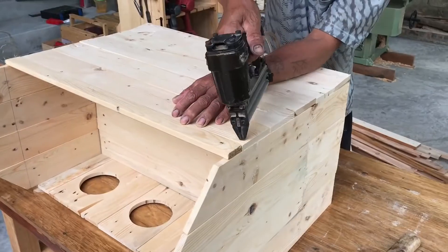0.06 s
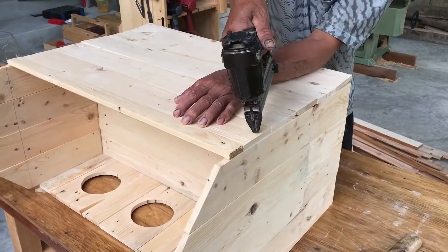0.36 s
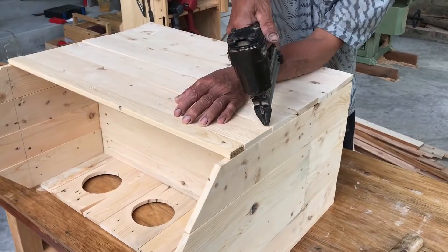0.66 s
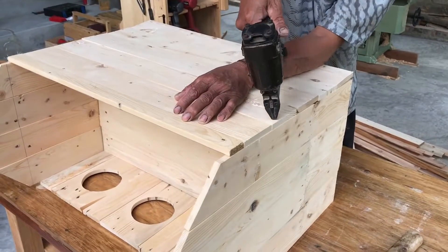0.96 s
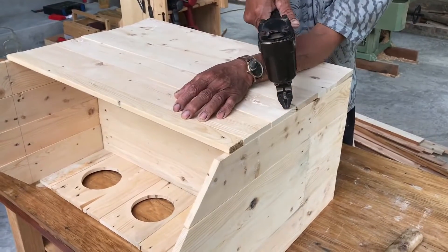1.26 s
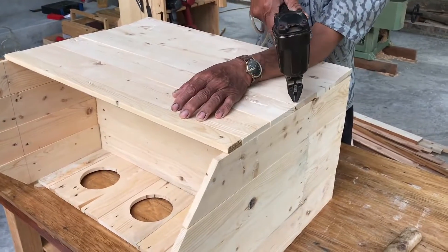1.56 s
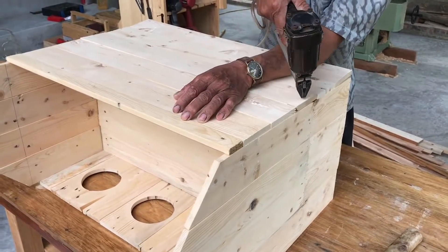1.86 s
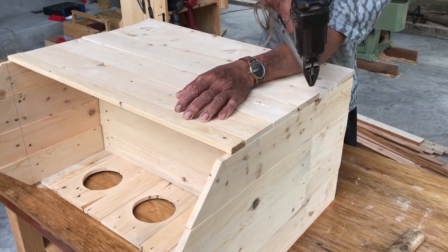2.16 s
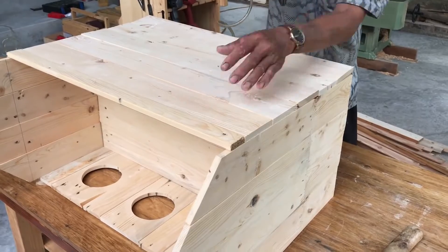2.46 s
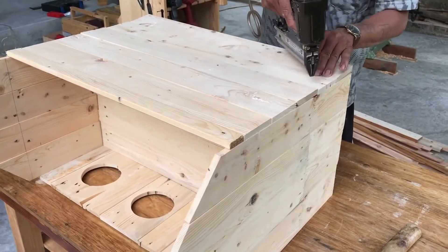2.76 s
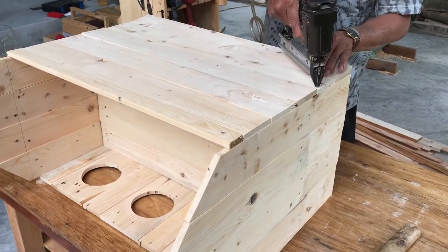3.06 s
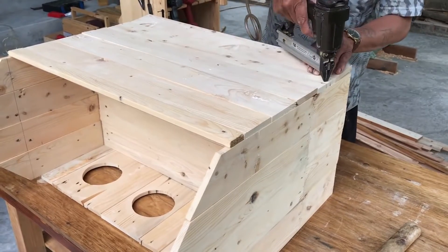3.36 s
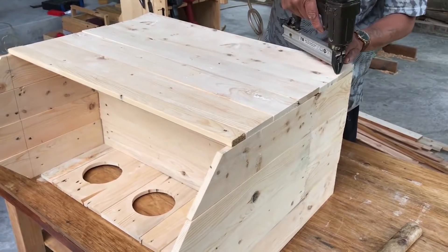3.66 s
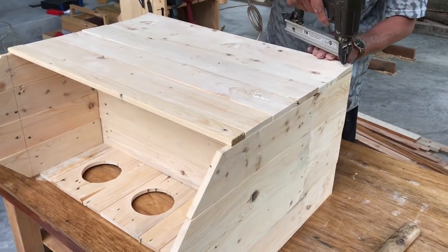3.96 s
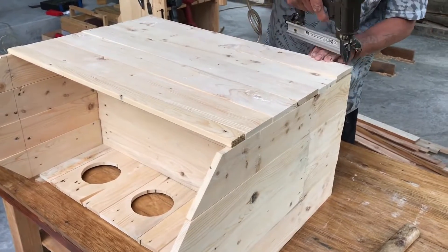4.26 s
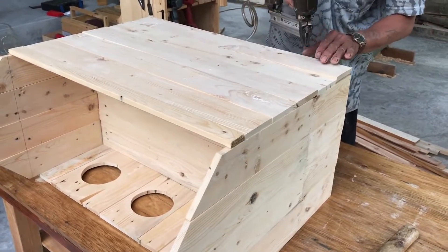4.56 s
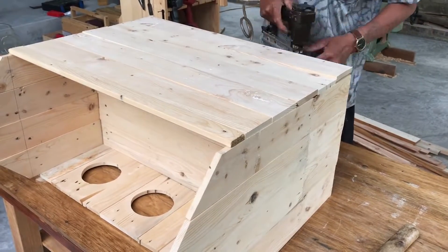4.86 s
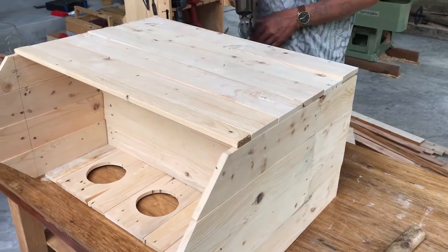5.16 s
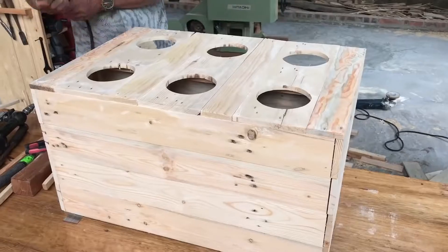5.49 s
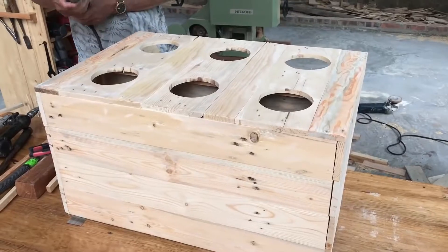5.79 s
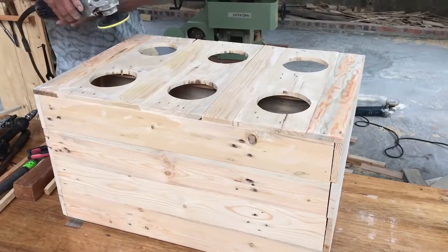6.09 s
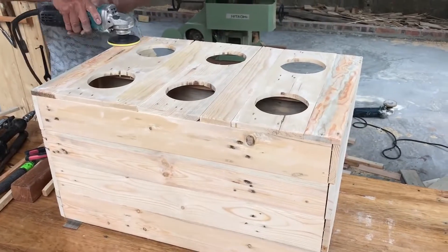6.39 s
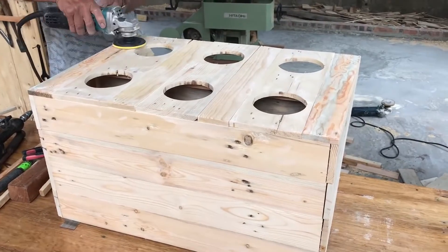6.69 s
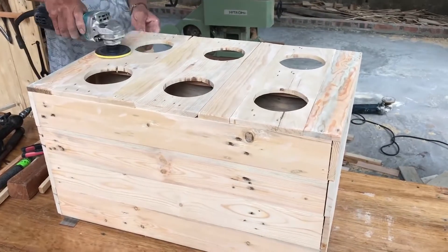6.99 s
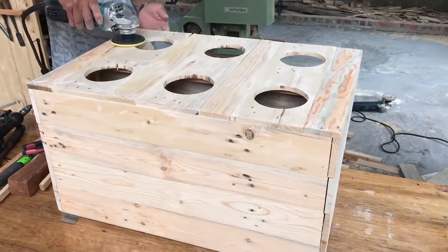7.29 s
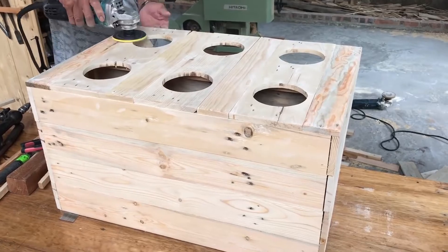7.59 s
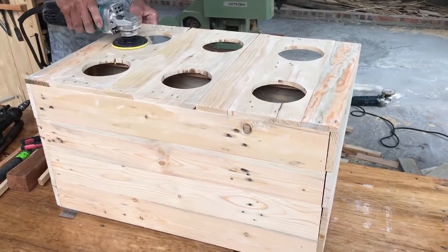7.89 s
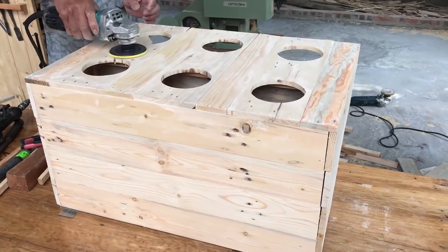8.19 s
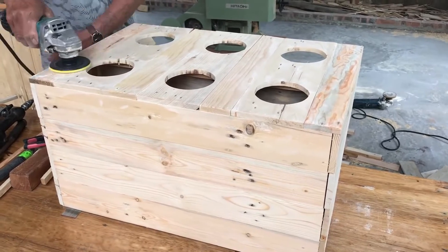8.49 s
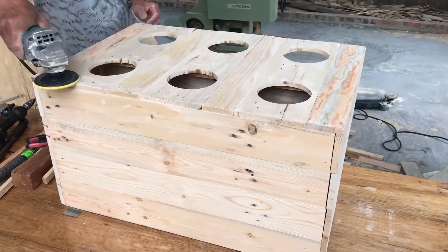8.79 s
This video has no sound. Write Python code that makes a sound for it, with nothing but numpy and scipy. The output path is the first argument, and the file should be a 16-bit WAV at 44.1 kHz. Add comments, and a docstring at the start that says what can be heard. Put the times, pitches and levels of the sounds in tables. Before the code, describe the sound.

An air nailer drives eleven nails into a wooden box, a run of seven, a short pause, then four more. Each shot is a hissing crack with a woody thump and a bright exhaust clack right behind it. After a lull, an angle grinder switches on with a rushing whine and its sanding disc rasps over the boards in short touches. Heard close, in stereo, over faint workshop noise.

```python
"""Air nailer and angle grinder

A workshop, a stereo pair close to the bench. An air nailer drives eleven nails into a pine box: each
shot is a valve hiss, the driver's crack with a thump of the boards, and a bright exhaust clack as the
piston returns. Then an angle grinder spins up and sands the box: its fan rushes, its gears whine, and
the disc rasps and makes the boards drone. The recorder's gain control ducks the room noise."""
import sys
import numpy as np
from scipy import signal
from scipy.fft import rfft, irfft, next_fast_len
from scipy.io import wavfile
from scipy.ndimage import uniform_filter1d

SR = 44100
rng = np.random.default_rng(int(sys.argv[2]) if len(sys.argv) > 2 else 0)


def store_pcm(level_fs):
    """Save levels as 16-bit WAV."""
    pcm = np.round(np.clip(level_fs, -1, 1) * 32767).astype(np.int16)
    wavfile.write(sys.argv[1], SR, np.atleast_2d(pcm).T)


N = 394254
TIME = np.arange(N) / SR

# spectra of the nailer's hiss, and of the box's woody knock and low thud: frequency_hz, level_db
HISS_SPECTRUM = [(200, -9), (600, -10.5), (1500, -5), (3000, -4), (6000, -4.5), (8000, -5.5), (15000, -4.5)]
KNOCK_SPECTRUM = [(60, -7), (150, 3), (300, -0.5), (500, -8.5), (680, -6), (1100, -10), (2500, -48)]
THUD_SPECTRUM = [(25, -5.5), (90, -4.5), (160, -7), (300, -19.5), (700, -33.5), (2000, -56)]

FIRM_THUMP_DB = -16  # the boards under a firm blow
SWITCH_ON_S = 5.946
MESH_START_HZ, MESH_TOP_HZ = 2794, 6874  # the rate at which the grinder's gear teeth meet


def gain_of(db):
    """Decibels to gain."""
    return 10 ** (np.asarray(db) / 20)


def unit_rms(x):
    """Scales to rms 1."""
    return x / np.sqrt(np.mean(x ** 2) + 1e-20)


def value_at(points, hz):
    """Reads a table on a log-frequency axis."""
    table_hz, value = np.transpose(points)
    return np.interp(np.log(hz + 1), np.log(table_hz + 1), value)


def add(mix, start_s, sound):
    """Mixes a sound in at a time."""
    start = round(start_s * SR)
    sound = sound[..., max(-start, 0):]
    part = mix[:, max(start, 0):][:, :sound.shape[-1]]
    part += sound[..., :part.shape[1]]


def colour(x, spectrum):
    """Gives two unrelated channels a spectrum and the likeness of the microphone pair."""
    # likeness of left and right: frequency_hz, correlation
    pair_likeness = [(50, 0.96), (300, 0.41), (700, 0.18), (1400, 0.64), (3000, 0.25), (15000, 0.2)]
    hz = np.fft.rfftfreq(x.shape[1], 1 / SR)
    likeness = value_at(pair_likeness, hz)
    a, b = rfft(x)
    mid, side = a * np.sqrt(1 + likeness), b * np.sqrt(1 - likeness)
    shaped = np.array([mid + side, mid - side]) * gain_of(value_at(spectrum, hz))
    return unit_rms(irfft(shaped, x.shape[1]))


def noise(spectrum, size=N):
    """Steady stereo noise from points of frequency_hz, level_db."""
    return colour(rng.standard_normal((2, next_fast_len(size))), spectrum)[:, :size]


def burst(spectrum, rise_s, t60, snap_s=None, size=8192):
    """A puff of noise that swells and dies away, with an optional snap at its front."""
    t = np.arange(size) / SR
    shape = (1 - np.exp(-t / rise_s)) ** 2 * gain_of(-60 * t / t60)
    if snap_s:
        shape *= 1 + np.exp(-t / snap_s)
    return shape * noise(spectrum, size)


def held(start_s, length_s, attack_s, release_s):
    """An envelope that rises, holds and dies away."""
    t = TIME - start_s
    return np.clip(t / attack_s, 0, 1) * np.exp(-np.clip((t - length_s) / release_s, 0, 20))


def wander(hz):
    """Random drift of rms 1, up to a rate."""
    return unit_rms(signal.sosfilt(signal.butter(2, hz, fs=SR, output="sos"), rng.standard_normal(N)))


def brighten(x, db, corner_hz=6500):
    """Lifts or lowers the treble."""
    size = x.shape[1]
    hz = np.fft.rfftfreq(2 * size, 1 / SR)
    shelf = gain_of(db / (1 + (corner_hz / (hz + 1)) ** 6))
    return irfft(rfft(x, 2 * size) * shelf)[:, :size]


def room_tone(dropout_s=5.584):
    """Steady shop noise, with a brief dropout at a cut between the two jobs."""
    # background noise: frequency_hz, level_db
    shop_spectrum = [(24, -37), (40, -6.5), (101, 1.5), (126, -2.5), (522, -11.5), (686, -8.5), (949, -12),
                     (1130, -10), (3300, -19.5), (15500, -42.5)]
    dropout_db = -25 * np.exp(-((TIME - dropout_s) / .011) ** 2)
    return gain_of(-68 + dropout_db) * noise(shop_spectrum)


def swelling_hiss(swell_s, t60, size=4096):
    """A soft hiss swells into the hit and dies away; gives (start_s from the peak, hiss)."""
    t = np.arange(-size, size) / SR
    shape = np.exp(np.minimum(t, 0) / swell_s) * gain_of(-60 * np.maximum(t, 0) / t60)
    return -size / SR, shape * noise(HISS_SPECTRUM, 2 * size)


def early_reflections(x, strength=.33, count=4):
    """Nearby boards throw the sound back and comb each blow a little differently."""
    out = x.copy()
    for delay_s, sign in zip(rng.uniform(.0006, .005, count), rng.choice([-1, 1], count)):
        add(out, delay_s, strength * sign * x)
    return out / np.sqrt(1 + count * strength ** 2)


def board_thump(hz, swell_s, sway=.55, sway_hz=118):
    """Pushed boards swing back for a cycle or two; the box's side walls sway against each other."""
    t = np.arange(6000) / SR
    walls = sway * np.array([[1], [-1]]) * np.sin(2 * np.pi * (sway_hz * t + rng.random()))
    return (walls - np.sin(2 * np.pi * hz * t)) * (t / swell_s) * np.exp(1 - t / swell_s)


def driver_blows(valve_lead_s=.011):
    """The valve puffs, the driver cracks down, the nail rings and the box knocks and thumps."""
    # one row a nail: start_s, crack_db, treble_db, thump_db, ring_hz, ring_db
    blows = [(-0.01,-26,-9.5,-34,3000,-34), (0.377,-24,-2,-15,3140,-25), (0.718,-20,-6,-44.5,1670,-24),
             (1.124,-19.5,-0.5,-15.5,1800,-26.5), (1.51,-19.5,-1,-15,2900,-32.5),
             (1.901,-20,-3.5,-23,1630,-23.5), (2.282,-23.5,-5,-17,2810,-40),
             (3.204,-20,-4.5,-35.5,3650,-18), (3.529,-20.5,-7.5,-40,2990,-35),
             (3.979,-19.5,-1,-25,2380,-34), (4.382,-19,-4.5,-21,1724,-19)]
    out = np.zeros((2, N))
    for start_s, crack_db, treble_db, thump_db, ring_hz, ring_db in blows:
        valve_s = start_s - valve_lead_s
        offset_s, hiss = swelling_hiss(swell_s=.0042, t60=.12)
        add(out, valve_s + offset_s, gain_of(-29) * hiss)
        add(out, valve_s, gain_of(-25.5) * burst(HISS_SPECTRUM, rise_s=.0006, t60=.036))
        add(out, start_s, gain_of(crack_db) * driver_crack(treble_db))
        ring = [(ring_hz / 2, -45), (ring_hz / 1.15, -18), (ring_hz, 0),
                (ring_hz * 1.15, -18), (ring_hz * 2, -45)]
        add(out, start_s, gain_of(ring_db) * burst(ring, rise_s=.0008, t60=.085))
        knock_db = -21 + .42 * (thump_db - FIRM_THUMP_DB)
        add(out, start_s, gain_of(knock_db) * burst(KNOCK_SPECTRUM, rise_s=.0011, t60=.068))
        add(out, start_s, -gain_of(thump_db) * board_thump(hz=82, swell_s=.0043))
        add(out, start_s, gain_of(thump_db - 8) * burst(THUD_SPECTRUM, rise_s=.0014, t60=.07))
    return out


def driver_crack(treble_db):
    """The driver lands with a sharp snap that glances off the boards."""
    # the impact: frequency_hz, level_db
    crack_spectrum = [(290, -33), (500, -11.5), (863, -7.5), (1510, -2.5), (1650, -6), (1900, -5.5),
                      (2930, -3.5), (3790, -4.5), (4840, -7), (5510, -5.5), (10200, -21), (14200, -20.5),
                      (15500, -27.5)]
    crack = burst(crack_spectrum, rise_s=.00041, t60=.12, snap_s=.0045)
    return brighten(early_reflections(crack), treble_db)


def piston_returns():
    """The piston clacks home and jolts the box as the exhaust opens and sighs out."""
    # one return after each nail: start_s, clack_db, thump_db
    returns = [(0.089,-17,-30.5), (0.45,-19,-26), (0.797,-18.5,-30.5), (1.2,-18.5,-19), (1.602,-16.5,-17.5),
               (1.996,-16,-20), (2.372,-19,-22), (3.278,-16.5,-31.5), (3.625,-18,-23), (4.059,-18.5,-16),
               (4.457,-20.5,-13.5)]
    # the exhaust clack: frequency_hz, level_db
    clack_spectrum = [(290, -31.5), (500, -9.5), (851, -15.5), (1170, -2.5), (2160, -9), (2610, -5),
                      (3480, -9.5), (4700, -8), (5130, -10), (5750, -5.5), (7340, -10), (13000, -6.5),
                      (15500, -12)]
    out = np.zeros((2, N))
    for start_s, clack_db, thump_db in returns:
        offset_s, hiss = swelling_hiss(swell_s=.009, t60=.041)
        add(out, start_s + offset_s, gain_of(-32) * hiss)
        clack = early_reflections(burst(clack_spectrum, rise_s=.0006, t60=.084, snap_s=.0026))
        add(out, start_s - .0005, gain_of(clack_db) * brighten(clack, db=-2.9))
        add(out, start_s, gain_of(-48.5) * burst(HISS_SPECTRUM, rise_s=.004, t60=.35, size=16384))
        add(out, start_s, gain_of(-13.5) * burst(KNOCK_SPECTRUM, rise_s=.00081, t60=.03))
        # a lighter return moves less of the box, which swings faster
        thump_hz = 94 * 2 ** ((FIRM_THUMP_DB - thump_db) / 19.5)
        add(out, start_s + .0008, gain_of(thump_db) * board_thump(thump_hz, swell_s=.0044))
        add(out, start_s, gain_of(thump_db - 5) * burst(THUD_SPECTRUM, rise_s=.0012, t60=.065))
    return out


def workshop_reverb(x):
    """Sparse reflections of random sign, each band dying at its own speed."""
    # decay of the room: frequency_hz, t60_s
    room_decay = [(80, 0.39), (400, 0.12), (2000, 0.29), (6000, 0.44), (15000, 0.17)]
    taps = np.zeros((2, SR))
    arrivals = np.arange(300, SR - 20, 20) + rng.integers(0, 20, (2, (SR - 301) // 20))
    np.put_along_axis(taps, arrivals, rng.choice([-1., 1.], arrivals.shape), 1)
    hz, t, bands = signal.stft(taps, SR, nperseg=256)
    decay = gain_of(-60 * t / value_at(room_decay, hz)[:, None])
    tail = signal.istft(bands * decay, SR, nperseg=256)[1]
    return signal.fftconvolve(x, tail / np.linalg.norm(tail[0]), axes=1)[:, :N]


def moving_reverb(x, turn_s=1.1):
    """The nailer moves along the box, so each shot meets another mix of the room's reflections."""
    return sum(workshop_reverb(x * np.cos(np.pi * (TIME / turn_s + shift))) for shift in (0, .5))


def thuds_and_slides():
    """Short thuds and ticks, and the rumble of hands sliding over the box."""
    # hands on the wood: start_s, length_s, level_db
    slides = [(2.794, .22, -63), (5.61, 0.49, -57.5)]
    # thuds and ticks (the one at 5.6 s is a click after the dropout): start_s, thud_db, tick_db
    thuds = [(0.172,-31.5,-55), (0.244,-45,-52), (0.564,-45.5,-65), (1.297,-50,-61), (2.105,-46,-56.5),
             (3.879,-50,-75), (4.198,-39.5,-57), (4.56,-45,-63), (5.599,-55,-53.5), (5.803,-64,-59),
             (6.158,-38,-22.5)]
    rumble_spectrum = [(25, -6.5), (90, 4.5), (160, -7), (300, -22.5), (900, -48)]
    tick_spectrum = [(400, -7), (1300, -3.5), (4000, -4), (15000, -28.5)]
    sliding = sum(gain_of(db) * held(start_s, length_s, attack_s=.028, release_s=.08)
                  for start_s, length_s, db in slides)
    out = noise(rumble_spectrum) * sliding
    for start_s, thud_db, tick_db in thuds:
        add(out, start_s, gain_of(thud_db - 2.5) * burst(THUD_SPECTRUM, rise_s=.00089, t60=.13))
        add(out, start_s, gain_of(tick_db - 8.5) * burst(tick_spectrum, rise_s=.00025, t60=.21))
    return out


def motor(mesh_hz):
    """The grinder's switch snaps, and its fan and gears come up to speed together."""
    since_s = np.maximum(TIME - SWITCH_ON_S, 0)
    speed = mesh_hz / MESH_TOP_HZ
    out = np.minimum(since_s / .04, 1) * (fan(speed) + gears(mesh_hz, speed, since_s))
    switch_spectrum = [(300, -27), (900, 4), (2300, 0), (4500, -2), (15000, -26)]
    add(out, SWITCH_ON_S, gain_of(-31.5) * burst(switch_spectrum, rise_s=.0033, t60=.3, size=16384))
    return shifting_reflections(out)


def whistle(hz, width_hz, step=12):
    """Noise in a narrow resonance: a tone whose strength and phase drift at random."""
    slow_time = TIME[::step]
    smooth = signal.butter(2, width_hz / 2, fs=SR / step, output="sos")
    real, imag = signal.sosfilt(smooth, rng.standard_normal((2, 2, len(slow_time))))
    drift = np.array([np.interp(TIME, slow_time, channel) for channel in real + 1j * imag])
    phase = 2 * np.pi * np.cumsum(hz * np.ones(N)) / SR
    return unit_rms((drift * np.exp(1j * phase)).real)


def flutter(x, depth_db):
    """Patches of the spectrum, some 300 Hz wide and 30 ms long, swell and fade."""
    bands = signal.stft(x, nperseg=1024)[2]
    patches = uniform_filter1d(rng.standard_normal(bands.shape[1:]), size=7, axis=0)
    patches = unit_rms(uniform_filter1d(patches, size=3, axis=1))
    return unit_rms(signal.istft(bands * gain_of(depth_db * patches), nperseg=1024)[1][:, :N])


def fan(speed, fizz_hz=5960, db_per_octave=10):
    """The fan blows through resonant vents, louder and brighter with speed."""
    # rush of the air: frequency_hz, level_db
    rush_spectrum = [(100, -24.5), (450, -14), (750, -5.5), (1000, -6), (1350, 2), (1900, -9), (3000, -1),
                     (4000, 0.5), (4900, -3.5), (6800, -3), (7700, -8), (12500, -8.5), (15500, -11.5)]
    # air resonances of the vents: pitch_hz, width_hz, level_db
    vent_modes = [(1410, 300, -3), (2285, 350, -6.5), (2974, 200, -5.5), (4060, 230, -13),
                  (5520, 500, -6.5)]
    vents = unit_rms(sum(gain_of(db) * whistle(hz, width_hz) for hz, width_hz, db in vent_modes))
    air = gain_of(4) * noise(rush_spectrum) + gain_of(-1) * flutter(vents, depth_db=3.5)
    air *= gain_of(1.33 * wander(120) + .61 * wander(7.3))
    dull = signal.sosfiltfilt(signal.butter(2, fizz_hz, fs=SR, output="sos"), air)
    fizz = speed ** .76 * (air - dull)
    return (dull + fizz) * gain_of(-31.5 + db_per_octave * np.log2(speed))


def gears(mesh_hz, speed, since_s, strain_s=.24):
    """Gears and armature whine through the housing, harder under the pull of the start."""
    # the two whines: mesh_multiple, free_running_db, extra_strain_db
    whines = [(1, -44.5, 2.5), (.63, -52.5, 24)]
    # response of the housing: frequency_hz, gain_db
    housing = [(1000, -18), (2500, -18), (4000, 14.5), (5500, 1), (6900, 3), (8500, -3), (14000, 6)]
    smear = .55 - .25 * speed  # the tone spreads wider while the pitch sweeps, most at low speed
    out = 0
    for multiple, free_db, strain_db in whines:
        hz = multiple * mesh_hz
        tone = np.sqrt(1 - smear) * whistle(hz, width_hz=204) + np.sqrt(smear) * whistle(hz, width_hz=830)
        out += gain_of(free_db + strain_db * np.exp(-since_s / strain_s) + value_at(housing, hz)) * tone
    return out * approach(db_per_s=7)  # the gear head turns to the microphone


def shifting_reflections(x, strength=.22, count=4):
    """Reflections off the box shift as the tool moves, so the colour of the rush keeps changing."""
    out, samples = x.copy(), np.arange(N)
    for delay_s, rate_hz, phase in rng.uniform([.0008, .4, 0], [.006, 1.5, 1], (count, 3)):
        delayed = samples - SR * (delay_s + .0002 * np.sin(2 * np.pi * (rate_hz * TIME + phase)))
        out += strength * np.array([np.interp(delayed, samples, channel) for channel in x])
    return out / np.sqrt(1 + count * strength ** 2)


def disc_contact(attack_s=.032, release_s=.044, settle_s=.86):
    """Gains of drone, bite, hiss and wobble as the disc lands, skims and is pressed down in touches."""
    # the disc on the wood: start_s, length_s, board_drone_db, grit_bite_db, edge_hiss_db
    touches = [(6.479,0.1,-33.5,-42.5,-37), (6.618,0.052,-31,-54,-35), (6.784,0.065,-37.5,-38,-40),
               (6.898,0.076,-38,-38.5,-38), (7.084,0.082,-36.5,-37,-30), (7.329,0.1,-32.5,-38.5,-38),
               (7.493,0.072,-38,-39.5,-39), (7.583,0.12,-32.5,-35,-41), (7.803,0.095,-34,-40.5,-39),
               (8.096,0.068,-62,-37.5,-27.5), (8.165,.06,-40,-42.5,-29.5), (8.498,0.039,-41,-37.5,-30),
               (8.598,0.096,-45,-37.5,-29.5), (8.737,0.028,-55,-37,-45), (8.855,0.072,-60,-38,-32.5)]
    since_s = np.maximum(TIME - touches[0][0], 0)
    landed = np.minimum(since_s / attack_s, 1)
    drone, bite, hiss = gain_of(-56) * landed, gain_of(-46.5) * landed, np.zeros(N)  # skimming
    for start_s, length_s, drone_db, bite_db, hiss_db in touches:
        touch = held(start_s, length_s, attack_s, release_s)
        drone = np.maximum(drone, gain_of(drone_db) * touch)
        bite = np.maximum(bite, gain_of(bite_db) * touch)
        hiss = np.maximum(hiss, gain_of(hiss_db) * touch)
    wobble = landed * gain_of(-55 + 16 * np.exp(-since_s / settle_s))
    return drone, bite, hiss, wobble


def sanding_disc(turn_hz):
    """Grit scrapes hardest once a turn; the uneven disc drums the boards at multiples of that rate."""
    # rasp of the grit and hiss of the disc's edge: frequency_hz, level_db
    rasp_spectrum = [(70, -30), (170, -8.5), (300, 4), (480, -6.5), (800, 1), (1400, -4.5), (1900, -5.5),
                     (3000, -3), (7000, -37), (15500, -17)]
    edge_spectrum = [(1000, -25), (2500, 9), (4500, -7), (8000, -3), (15000, -6)]
    # chatter of the disc: turn_multiple, level_db
    chatter_partials = [(4, -3), (5, -6), (6, 3.5), (8, 1), (9, 0), (10, -2.5)]
    drone, bite, hiss, wobble = disc_contact()
    pressure = 1 + .58 * np.sin(2 * np.pi * np.cumsum(turn_hz) / SR)
    grit = rng.standard_normal((2, N)) * gain_of(7.1 * np.clip(wander(2650), -2, 2)) * pressure
    rasp = flutter(colour(grit, rasp_spectrum), depth_db=4)  # each scrape favours its own pitches
    rasp *= gain_of(4.5 + 4.1 * np.tanh(wander(48)))
    chatter = sum(gain_of(db) * whistle(k * turn_hz, width_hz=53) for k, db in chatter_partials)
    growl = gain_of(2.5) * waver(2 * turn_hz, stray_hz=27.24)
    growl += gain_of(-11) * waver(6 * turn_hz, stray_hz=34.98)
    boards = drone * growl + wobble * whistle(turn_hz, width_hz=88)
    grip = np.minimum(bite / gain_of(-37), 1)  # a hard bite brings the full chatter
    return bite * (rasp + grip * chatter) + hiss * noise(edge_spectrum) + boards


def waver(hz, stray_hz):
    """A tone of steady strength whose pitch strays quickly, differently at each microphone."""
    pitch_hz = [hz + stray_hz * wander(41.3) for _ in range(2)]
    return np.sqrt(2) * np.sin(2 * np.pi * np.cumsum(pitch_hz, axis=1) / SR)


def approach(db_per_s, start_s=7.98):
    """Rising gain as the grinder moves towards the corner of the box nearest the microphones."""
    return gain_of(db_per_s * np.maximum(TIME - start_s, 0))


def scene(spin_up_s=.13, gear_teeth=44):
    """Both tools at the bench over the room tone, a touch louder in the right microphone."""
    hits = driver_blows() + piston_returns() + thuds_and_slides()
    since_s = np.maximum(TIME - SWITCH_ON_S, 0)
    mesh_hz = MESH_TOP_HZ - (MESH_TOP_HZ - MESH_START_HZ) * np.exp(-since_s / spin_up_s)
    grinder = (motor(mesh_hz) + sanding_disc(mesh_hz / gear_teeth)) * approach(db_per_s=1.36)
    mix = room_tone() + hits + gain_of(-28.5) * moving_reverb(hits) + grinder
    return mix * gain_of([[-.25], [.25]])


def record(dry, knee_db=-57, range_db=10, recovery_db_per_s=38, hold_s=.13, cutoff_hz=15850):
    """Gain control lifts quiet stretches, ducks at once for loud ones, holds, recovers; then a low-pass."""
    sensed = signal.sosfilt(signal.butter(2, 250, "high", fs=SR, output="sos"), dry)  # deaf to rumble
    power_db = 10 * np.log10(abs(uniform_filter1d((sensed ** 2).mean(0), size=400)) + 1e-12)
    over_db = np.clip(power_db - knee_db, 0, range_db + hold_s * recovery_db_per_s)
    fall_db = TIME * recovery_db_per_s
    duck_db = np.minimum(np.maximum.accumulate(over_db + fall_db) - fall_db, range_db)
    lifted = dry * gain_of(range_db - uniform_filter1d(duck_db, size=200))
    low_pass = signal.firwin(401, cutoff_hz, window=("kaiser", 8), fs=SR)
    return signal.oaconvolve(lifted, low_pass[None], "same")


dry = scene()
out = record(dry)
store_pcm(out)
```